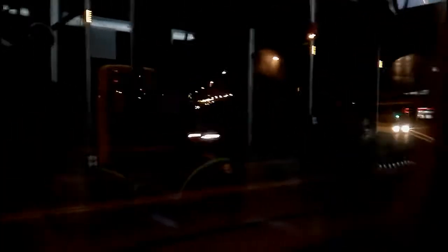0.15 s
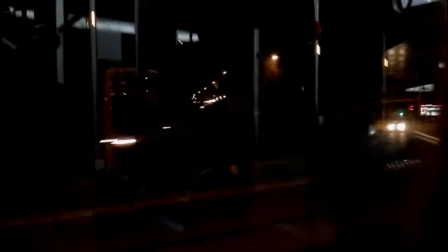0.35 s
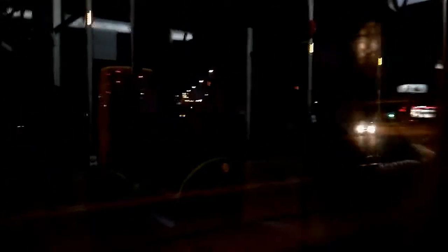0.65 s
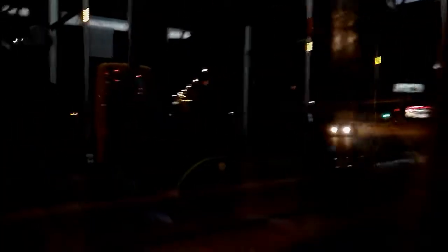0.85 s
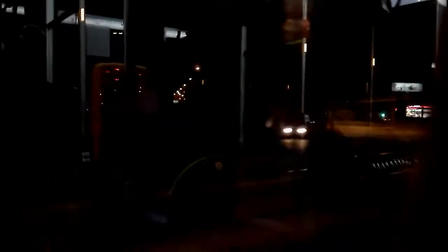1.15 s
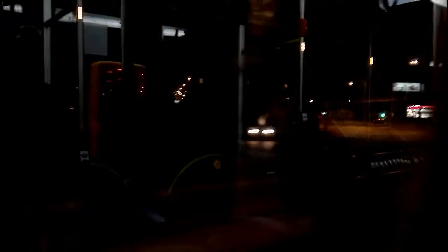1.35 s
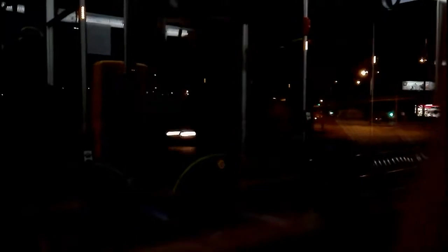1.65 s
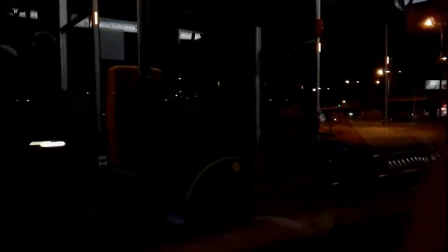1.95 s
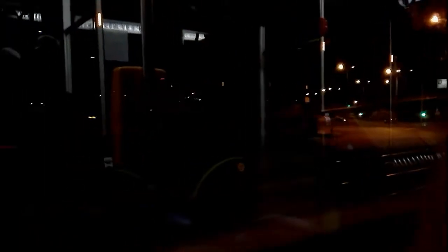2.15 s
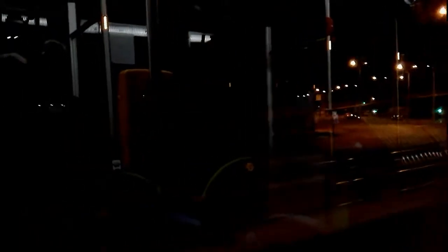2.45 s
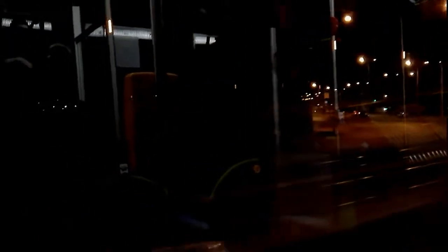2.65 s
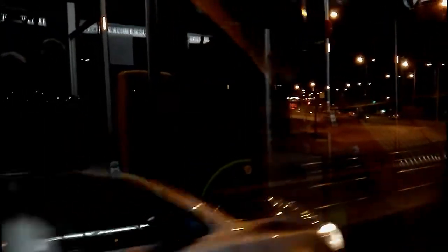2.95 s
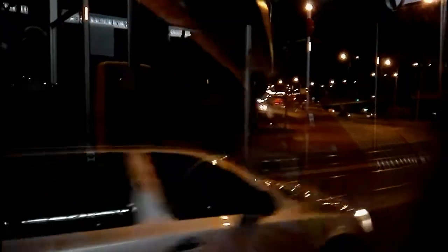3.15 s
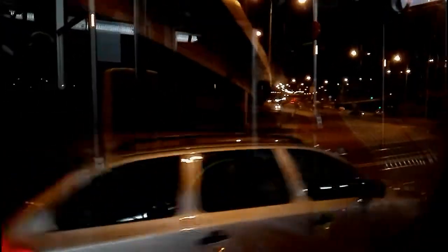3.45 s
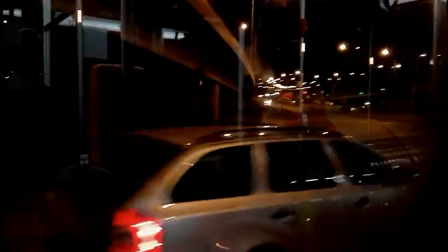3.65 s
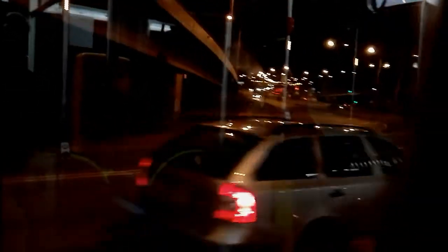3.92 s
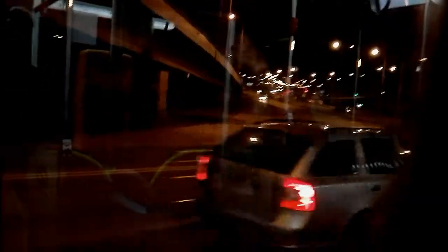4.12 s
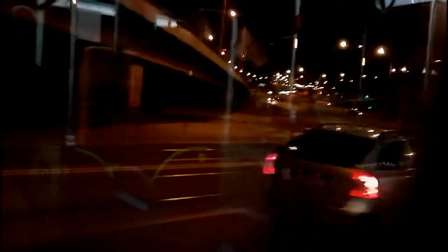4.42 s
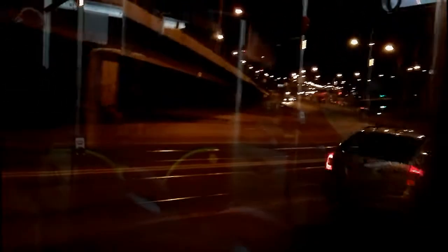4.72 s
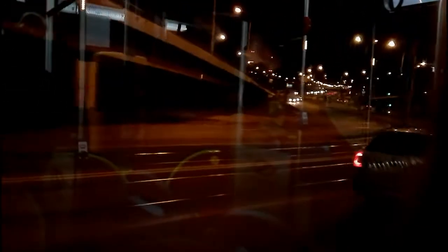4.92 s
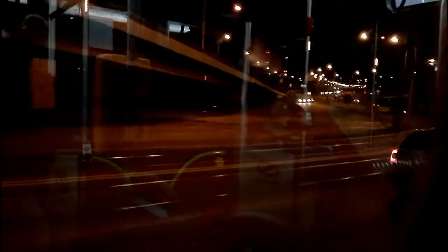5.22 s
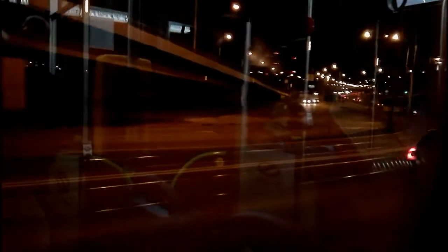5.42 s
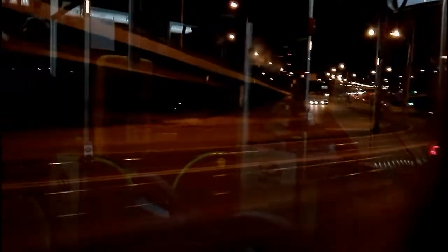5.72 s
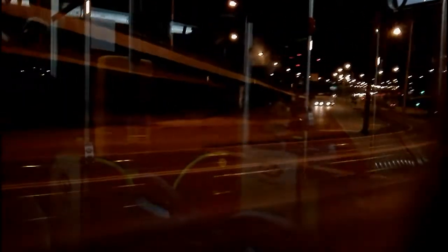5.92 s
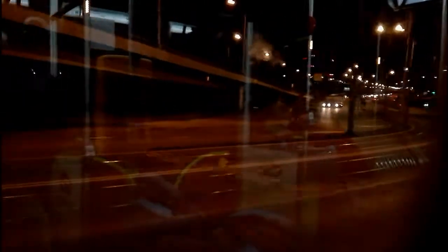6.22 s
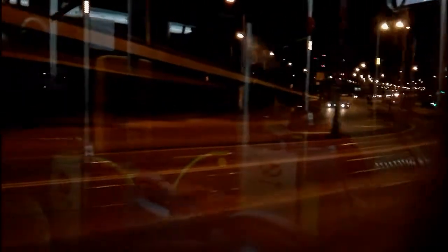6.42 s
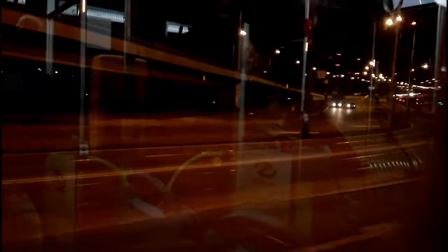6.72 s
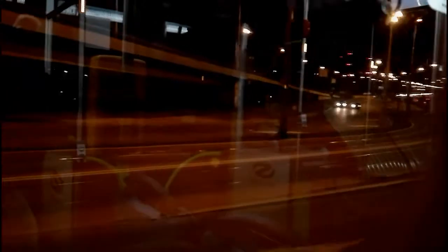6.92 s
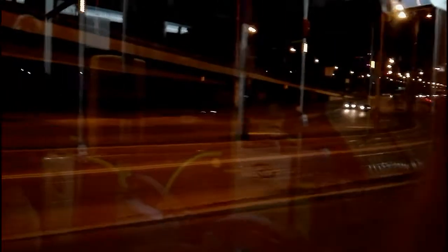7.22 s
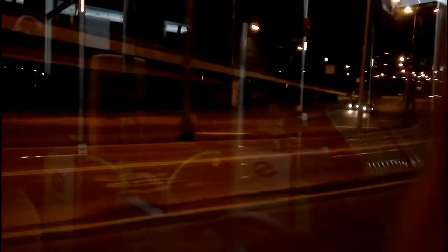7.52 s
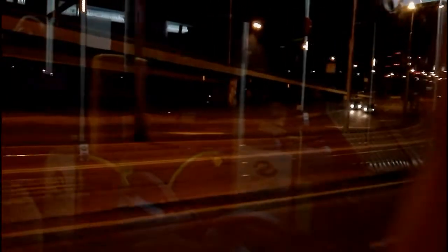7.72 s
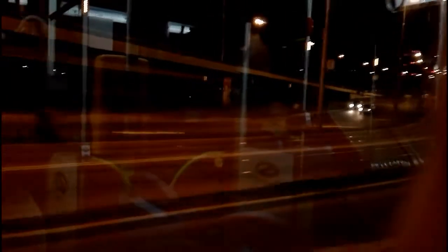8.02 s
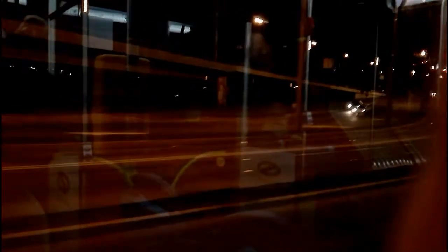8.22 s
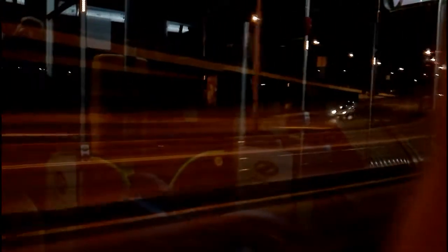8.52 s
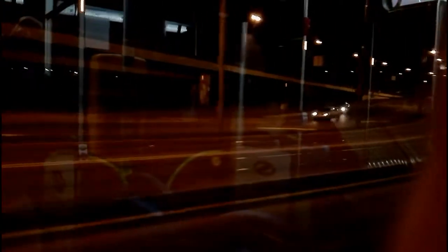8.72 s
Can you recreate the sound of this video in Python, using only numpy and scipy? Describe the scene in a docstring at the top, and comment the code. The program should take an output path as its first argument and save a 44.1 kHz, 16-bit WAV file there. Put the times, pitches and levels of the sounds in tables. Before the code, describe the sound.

Inside a city bus rolling steadily at night, a low diesel drone and a shaft hum sit in dark road and air roar. Very deep bumps come thickly in the first second. Loose trim chatters at once, then a thin turbo whistle flickers and climbs. The engine pull eases near four seconds, and panel knocks come close to the end. Single-channel pickup inside the cabin.

```python
"""Inside a city bus rolling at a nearly steady speed, with road and air roar filling the cabin.
The roar is shaped noise; trim panels tick, rattle and knock as random contacts shake them.
A turbocharger whistles on a moving pitch, and the wheels hop over the road far down as slow, deep swings.
A six-cylinder diesel drones in sines at multiples of its crank speed; a drive shaft and a gear mesh hum along."""
import sys
import numpy as np
from scipy import signal
from scipy.fft import rfft, irfft, next_fast_len
from scipy.io import wavfile
from scipy.ndimage import uniform_filter1d

SR = 44100
rng = np.random.default_rng(int(sys.argv[2]) if len(sys.argv) > 2 else 0)


def digitize_waveform(pressure):
    """Quantize a signal to 16-bit integers and store it at the path in sys.argv[1].

    Rows of a 2-D input are taken as channels; values are limited to [-1, 1].
    """
    field = np.atleast_2d(pressure).T
    bounded = np.clip(field, -1, 1)
    quanta = np.round(bounded * 32767).astype(np.int16)
    wavfile.write(sys.argv[1], SR, quanta)


N = 391166  # length in samples

# Cabin roar over time: start_s, level_db (550 to 1800 Hz), treble_lift_db
ROAR_LEVEL = [(0, -46, 5), (1.7, -47, 1.5), (2.2, -45.5, 1), (2.8, -46.5, 1), (4.6, -47, 3),
              (5.2, -47.5, 2), (5.8, -47, 1.5), (7, -48, 3), (7.8, -45.5, 2.5), (8.87, -45.5, 3)]
# Colour of the roar: pitch_hz, relative_level_db
ROAR_COLOUR = [(26, -39), (45, 0), (62, -7), (110, -6.5), (170, -10.5), (230, -10.5), (265, -13),
               (295, -12.5), (340, -16), (413, -21.5), (460, -22), (540, -27), (700, -25), (850, -24.5),
               (920, -27), (1050, -26), (1450, -30), (1700, -34), (2050, -39), (3700, -45.5), (4600, -50.5),
               (7000, -52), (9500, -61.5), (14200, -76.5)]

# Trim ticks: start_s, bright_contact_level_db, duller_panel_level_db (nominal peaks)
TICKS = [(.0952, -71, -66), (.164, -62, -55), (.5894, -68, -58), (.7194, -64, -59), (0.9193, -60, -47.5),
         (1.0091, -62, -62), (2.0725, -66, -56), (2.135, -63, -62), (2.4049, -64, -61), (2.4694, -67, -58),
         (2.969, -69, -56), (3.6509, -61, -58), (3.815, -65, -62), (4.24, -64, -55), (4.34, -65, -57),
         (4.369, -64, -57), (4.79, -68, -62), (5.043, -68, -57), (5.3293, -67, -62), (5.521, -62, -66),
         (6.299, -74, -58), (7.0683, -63, -59), (7.4994, -69, -59), (7.779, -70, -62), (8.246, -68, -60)]
# Loose trim chattering, blow by blow: start_s, level_db, centre_hz, width_hz
RATTLE_BLOWS = [(.256, -51, 6500, 9000), (.262, -56, 3200, 3000), (.273, -54, 4800, 3000),
                (.281, -58, 9000, 10000), (.295, -50.5, 6000, 10000), (.302, -51, 5000, 9000),
                (.309, -51, 3000, 5000), (.317, -54, 7000, 11000), (.328, -55, 7000, 10000),
                (.343, -54, 2800, 4000), (.359, -54, 3500, 5000), (.367, -57, 6500, 5000),
                (.381, -56, 5700, 1500), (.395, -56, 5800, 3000), (.404, -56, 6500, 5000),
                (.418, -56, 4500, 4500), (.428, -57, 6500, 3500), (4.5, -58, 6000, 1800),
                (4.512, -58, 5700, 1800), (4.522, -58, 6500, 1800), (7.373, -50, 7400, 1800),
                (7.379, -49, 6300, 2200), (7.388, -53, 6000, 2600), (7.398, -56, 6500, 2600),
                (7.41, -59, 6000, 2600), (7.431, -60, 6500, 1800)]
# Ringing modes of the trim: pitch_hz, t60_s (time to fall by 60 dB)
TRIM_MODES = [(1950, .014), (2500, .008), (3150, .008), (3900, .008), (4350, .008), (4800, .009),
              (5250, .009), (5670, .012), (6220, .01), (6630, .011), (7070, .011), (7600, .007),
              (8200, .006), (8900, .004), (9700, .004), (10800, .003), (12000, .003), (13300, .003)]
# Knocks on a panel: start_s, level_db, brightness_db_per_octave, rise_s, contact_s
KNOCKS = [(7.373, -50.5, 0, .002, .024), (7.408, -55, 1, .003, .008), (7.78, -53, -5, .008, .012),
          (7.792, -40.5, -4, .002, .006), (7.796, -40.5, 1, .002, .01), (7.809, -46, -2, .003, .014),
          (8.255, -51, -9, .002, .008), (8.262, -49, -2, .003, .008), (8.267, -46, 1, .002, .01),
          (8.276, -48.5, 0, .002, .008), (8.286, -53, 0, .003, .012)]
# Ringing modes of the panel: pitch_hz, t60_s, relative_level_db
PANEL_MODES = [(1030, .02, -7), (1380, .022, -2), (1500, .025, -1), (1720, .02, -4), (2150, .012, -8),
               (2450, .012, -6), (2850, .014, -2), (3200, .012, -1), (3520, .016, -2), (3800, .012, -4),
               (4250, .008, -7), (4850, .007, -9), (5750, .005, -15), (7000, .003, -20)]
# Short bright hisses: start_s, level_db, centre_hz, width_hz, rise_s, hold_s, t60_s
HISSES = [(4.473, -60.5, 6100, 2400, 0.022, 0.028, 0.11), (7.37, -59, 6600, 2400, 0.002, 0.012, 0.25)]

# Turbocharger pitch: time_s, pitch_hz
TURBO_PITCH = [(1.98, 5015), (2.1, 5060), (2.46, 5180), (2.66, 5260), (3.0, 5355), (3.45, 5460),
               (3.6, 5455), (4.7, 5385), (5.42, 5140), (5.66, 5020), (5.88, 5025), (6.1, 5120)]
# Turbocharger level: time_s, level_db
TURBO_LEVEL = [(1.6, -90), (1.75, -79), (1.93, -80), (2, -69.5), (2.06, -71), (2.11, -81), (2.2, -71.5),
               (2.35, -73), (2.4, -80), (2.45, -71), (2.52, -88), (2.63, -85), (2.69, -70.5), (2.75, -79),
               (2.8, -68.5), (2.86, -79), (2.95, -70.5), (3.02, -80), (3.1, -72.5), (3.2, -84), (3.27, -78),
               (3.38, -84), (3.45, -71), (3.5, -69.5), (3.57, -72), (3.64, -90), (4.65, -90), (4.78, -76),
               (5.15, -79), (5.3, -88), (5.4, -82), (5.46, -71), (5.52, -73), (5.58, -70.5), (5.65, -71),
               (5.71, -88), (5.84, -86), (5.9, -75), (6.05, -82), (6.15, -90)]
# Faint broken tone: start_s, length_s, level_db
TONE_SPELL = (4.5, 2.95, -62.5)

# Road bumps: peak_s, wheel_hop_db, floor_shudder_db
BUMPS = [(0.056, -16.5, -29), (.15, -40, -36), (.34, -16, -23), (.41, -15, -28), (.47, -21, -25),
         (.62, -23, -33), (.72, -19.5, -26), (.85, -18, -39), (.95, -30, -23.5), (1.03, -21, -23),
         (1.14, -19, -25), (1.47, -27.5, -38), (1.94, -27, -40), (2.25, -34.5, -34), (2.62, -34, -33),
         (3.11, -33, -41), (3.35, -22, -37), (4.01, -41, -38), (4.43, -38, -32), (5.02, -26.5, -43),
         (5.13, -23.5, -41), (5.94, -34, -40), (6.18, -28, -39), (6.38, -25, -35), (6.6, -33, -36),
         (6.89, -51, -41), (7.55, -42, -39), (7.99, -44, -43), (8.27, -23, -36), (8.38, -20, -40),
         (8.48, -29, -31), (8.82, -39, -36)]

# Engine speed: time_s, firings_hz (one group of three cylinders)
ENGINE_SPEED = [(0, 25.28), (.35, 25.18), (2.3, 25.72), (3.3, 25.88), (4.3, 25.94), (5.8, 25.95),
                (6.6, 26.13), (8.87, 26.88)]
# The driveline judders about ten times a second as the pull ends: start_s, length_s, speed_share_db
JUDDER = [(3.8, 1.6, -43)]
# Engine load, heard as the level of the firing order: time_s, level_db
ENGINE_LOAD = [(.4, -39), (.65, -31), (.8, -29), (1.05, -26), (1.2, -25.5), (1.6, -27), (2.4, -24),
               (3.55, -26), (3.9, -35.5), (4.2, -35.5), (4.45, -26.5), (4.8, -27.5), (5.1, -45), (5.5, -40),
               (5.9, -33), (6.4, -40), (7.2, -41.5), (7.9, -32.5), (8.87, -34.5)]
# Engine order 7.5, which fades after the pull: time_s, level_db
UPPER_ORDER = [(.2, -41), (.7, -34), (1.7, -33), (3.6, -38), (4, -46), (6, -48), (7, -44), (8.87, -44)]
# Weaker engine orders; uneven cylinders fill the halves: crank_multiple, level_db (before the pull change)
ENGINE_ORDERS = [(4, -38), (5, -50), (6, -35.5), (6.5, -49), (8, -45), (8.5, -46), (9, -46), (9.5, -57),
                 (10, -51), (10.5, -59), (12, -58.5), (12.5, -69), (13, -52), (13.5, -54), (15, -62),
                 (16, -57.5), (16.5, -50.5), (17, -53.5), (17.5, -60.5), (19, -60), (19.5, -65.5),
                 (22, -56.5)]
# The weaker engine orders sink when the pull ends: time_s, change_db
PULL = [(.2, -1), (1, -1.5), (3.5, -2.5), (3.9, -5.5), (6, -5), (8.87, -5)]
# Weaker drive shaft orders: shaft_multiple, level_db
SHAFT_ORDERS = [(2, -50.5), (5, -42), (6, -52.5), (12, -56), (18, -61)]
# Strong drive shaft orders: time_s, order_4_db, order_10_db
SHAFT_HUM = [(.2, -47, -53), (.6, -40, -44.5), (1, -42, -49.5), (1.5, -42, -42), (2, -32.5, -44),
             (2.4, -43, -45.5), (3, -53, -40), (3.3, -28, -43), (3.6, -41, -57), (3.9, -35.5, -43),
             (4.2, -35, -48.5), (4.7, -41, -40), (5.1, -32, -45), (5.5, -42, -43), (6, -35, -43),
             (6.3, -48, -42.5), (6.6, -33.5, -47.5), (7.2, -35.5, -41.5), (7.5, -35, -50), (8.4, -31, -43),
             (8.87, -31, -42.5)]
# Gear mesh and two high shaft orders: time_s, mesh_db, order_17_db, order_20_db
MESH_LEVEL = [(.2, -51, -73, -57), (1.5, -48.5, -72, -67), (2.4, -52, -73, -75), (4.5, -51, -75, -56),
              (5.6, -48.5, -76, -53), (6.2, -55.5, -72, -57.5), (7.5, -54, -70, -51.5),
              (8.5, -52, -63, -52.5)]

TICK_RISE_S, TICK_CONTACT_S = .008, 0.021
FAINT_TICK_DB, FAINT_SPREAD_DB = (-69, -70), 9  # loudest bright and panel levels; how far they may fall
RATTLE_RISE_S, RATTLE_T60_S = 0.002, .1
CONTACTS_PER_S = 3000  # average rate of tiny contacts while something is struck
TONE_HZ = 853
HOP_HZ, BUMP_RISE_S, HOP_T60_S = 12.8, 0.2, 0.54
SHUDDER_HZ, SHUDDER_RISE_S, SHUDDER_T60_S = 33, 0.061, 0.26
HEAVE_SHARE, SHUDDER_NOISE_SHARE = .35, .6  # noise beside each swinging tone
SMOOTH_HOP_DB, SMOOTH_SHUDDER_DB, UNEVEN_DB = -33.5, -41.5, 0.5  # the road between bumps
SPEED_WOBBLE = .001  # typical share by which the speed drifts
SHAFT_PER_CRANK, MESH_PER_CRANK = 1.396, 28.575  # speed ratios
THIRD_DB = -36.5  # middle level of engine order 4.5
EDGE_HZ = 14380  # upper limit of this sound's band


def gain_of(db):
    """Turns decibels into amplitude."""
    return 10 ** (np.asarray(db) / 20)


def evened(x):
    """Scales a signal to an rms (average strength) of 1."""
    return x / np.sqrt(np.mean(x ** 2) + 1e-20)


def curves(rows):
    """Joins the points of each table column by straight lines in time."""
    time_s, *columns = np.transpose(rows)
    t = np.arange(N) / SR
    return [np.interp(t, time_s, column) for column in columns]


def add(mix, start_s, sound):
    """Lays a sound into the mix at a time, cut off at the end."""
    part = mix[round(start_s * SR):][:len(sound)]
    part += sound[:len(part)]


def band_noise(size, hz, width_hz):
    """Makes noise whose spectrum is a bell around one pitch, with rms 1."""
    padded = next_fast_len(size, real=True)
    f = np.fft.rfftfreq(padded, 1 / SR)
    random_spectrum = rng.standard_normal(len(f)) + 1j * rng.standard_normal(len(f))
    bell = 1 / (1 + (2 * (f - hz) / width_hz) ** 2)
    return evened(irfft(random_spectrum * bell, padded)[:size])


def drift(spread_db):
    """Makes a level in dB that wanders slowly, over about a second or longer."""
    return spread_db * band_noise(N, 0, 1.7)


def chatter(size, spread_db):
    """Makes a contact's strength jump up and down within about a millisecond."""
    return gain_of(spread_db * band_noise(size, 0, 640))


def tone(hz, db, waver_db):
    """Makes a sine on a moving pitch whose level wavers at random."""
    phase = 2 * np.pi * (np.cumsum(hz) / SR + rng.random())
    level = gain_of(db + waver_db * band_noise(N, 0, 13.4))
    return np.sqrt(2) * level * np.sin(phase)  # a sine of rms 1 peaks at the root of 2


def spells(rows, edge_s):
    """Makes an amplitude that swells before each spell, holds through it and dies after."""
    t = np.arange(N) / SR
    total = 0
    for start_s, length_s, db in rows:
        inside_s = np.minimum(t - start_s, start_s + length_s - t)
        total = total + gain_of(db) * np.clip(inside_s / edge_s + 1, 0, 1) ** 2
    return total


def jolts(peak_s, dbs, rise_s, t60_s):
    """Makes an amplitude that swells to each blow and dies away; overlapping powers add."""
    t = np.arange(0, N / SR, .001)  # steps of a millisecond are fine enough
    late_s = t[:, None] - np.asarray(peak_s)
    swell = np.clip(late_s / rise_s + 1, 0, 1) ** 2
    shape = swell * gain_of(np.asarray(dbs) - 60 * np.maximum(late_s, 0) / t60_s)
    return np.interp(np.arange(N) / SR, t, np.sqrt((shape ** 2).sum(1)))


def struck(force, hz, t60_s, db):
    """Rings a set of modes by tiny random contacts that follow the force over time."""
    t = np.arange(SR // 32) / SR
    rings = gain_of(-60 * t / t60_s[:, None]) * np.sin(2 * np.pi * hz[:, None] * t)
    share = gain_of(db) / np.linalg.norm(gain_of(db))
    rings *= (share / np.linalg.norm(rings, axis=1))[:, None]
    touching = rng.random(len(force)) < CONTACTS_PER_S / SR
    contacts = force * touching * np.sqrt(SR / CONTACTS_PER_S)  # fewer contacts hit harder
    hits = contacts * rng.standard_normal((len(hz), len(force)))
    return signal.fftconvolve(hits, rings, axes=1).sum(0)


def roar():
    """Road and air make noise whose spectrum drifts in patches; loose trim makes the treble flicker."""
    hop = 256  # samples between short spectra
    frames, hz = N // hop + 5, np.fft.rfftfreq(1024, 1 / SR)
    real, imaginary, patches = rng.standard_normal((frames, len(hz), 3)).T
    patches = uniform_filter1d(patches, 10, 0)  # smooth across pitch
    patches = evened(uniform_filter1d(patches, 12, 1))  # smooth across time
    level_db, lift_db = curves(ROAR_LEVEL)
    lift_db = np.interp(np.arange(frames) * hop, np.arange(N), lift_db)
    treble = np.clip(np.log2(hz / 1300 + 1e-9) / 3, 0, 1)[:, None]  # 0 below 1300 Hz, 1 three octaves up
    flicker = evened(uniform_filter1d(rng.standard_normal(frames), size=6))
    change_db = 0.76 * patches + treble * (lift_db + 1.4 * flicker)
    spectra = (real + 1j * imaginary) * gain_of(change_db)
    uncoloured = signal.istft(spectra, nperseg=1024, noverlap=1024 - hop)[1]

    f = np.fft.rfftfreq(len(uncoloured), 1 / SR)
    colour_hz, colour_db = np.transpose(ROAR_COLOUR)
    colour = gain_of(np.interp(np.log(f + 1), np.log(colour_hz + 1), colour_db))
    spectrum = rfft(uncoloured) * colour
    middle = irfft(spectrum * (f > 550) * (f < 1800), len(uncoloured))  # the band that sets the level
    return gain_of(level_db) * irfft(spectrum, len(uncoloured))[:N] / np.std(middle)


def ticks():
    """Brief contacts give very high noise with duller panel noise below; a faint rustle fills between."""
    out, t = np.zeros(N), np.arange(SR // 8) / SR
    crest = 2.6  # peak over rms of a noisy contact
    faint = []
    for when, softness in rng.random(size=(30, 2)):
        faint.append((when * N / SR, *(FAINT_TICK_DB - FAINT_SPREAD_DB * softness)))
    contact = np.exp(-(t / TICK_CONTACT_S) ** 2)
    tail = 0.36 * gain_of(-60 * t / 0.22)
    shape = np.clip(t / TICK_RISE_S, 0, 1) * (contact + tail)
    for start_s, bright_db, panel_db in TICKS + faint:
        bright = gain_of(bright_db) * band_noise(len(t), 11900, 2200)
        panel = gain_of(panel_db) * band_noise(len(t), 6800, 6000)
        tick = shape * chatter(len(t), 2.5) * (bright + panel) / crest
        add(out, max(start_s - TICK_RISE_S, 0), tick)
    rustle = gain_of(2.8 * band_noise(N, 0, 15)) * band_noise(N, 11500, 5000)
    return out + gain_of(-86) * rustle


def rattle():
    """Ragged runs of small blows ring the trim, each blow reaching its own range of modes."""
    out, t = np.zeros(N), np.arange(SR // 10) / SR
    force = np.clip(t / RATTLE_RISE_S, 0, 1) * gain_of(-60 * t / RATTLE_T60_S)
    modes_hz, t60_s = np.transpose(TRIM_MODES)
    for start_s, db, hz, width_hz in RATTLE_BLOWS:
        reach_db = -20 * np.log10(1 + (2 * (modes_hz - hz) / width_hz) ** 2)
        add(out, start_s - RATTLE_RISE_S, gain_of(db) * struck(force, modes_hz, t60_s, reach_db))
    return out


def hisses():
    """Bursts of high noise rise, hold briefly and die away."""
    out, t = np.zeros(N), np.arange(SR // 4) / SR
    for start_s, db, hz, width_hz, rise_s, hold_s, t60_s in HISSES:
        fading_s = np.maximum(t - rise_s - hold_s, 0)
        shape = np.clip(t / rise_s, 0, 1) * gain_of(-60 * fading_s / t60_s)
        noise = chatter(len(t), 3.2) * band_noise(len(t), hz, width_hz)
        add(out, start_s, gain_of(db) * shape * noise)
    return out


def knocks():
    """Each blow or bounce rings the panel modes, which go on buzzing faintly."""
    out, t = np.zeros(N), np.arange(SR // 4) / SR
    hz, t60_s, mode_db = np.transpose(PANEL_MODES)
    buzz = .36 * gain_of(-60 * t / 0.39)
    for start_s, db, tilt_db, rise_s, contact_s in KNOCKS:
        force = np.clip(t / rise_s, 0, 1) * (np.exp(-(t / contact_s) ** 2) + buzz)
        tilted_db = mode_db + tilt_db * np.log2(hz / 3000)
        add(out, start_s, gain_of(db) * struck(force, hz, t60_s, tilted_db))
    return out


def whistles():
    """The turbocharger's fluttering sine climbs and sinks in pitch; a lower tone nearly holds its own."""
    pitch_hz, = curves(TURBO_PITCH)
    level_db, = curves(TURBO_LEVEL)
    flutter_db = level_db + 1.4 * band_noise(N, 0, 30)
    turbo = tone(pitch_hz * (1 + 0.0015 * band_noise(N, 0, 33)), flutter_db, .4)
    steady = tone(TONE_HZ * (1 + .004 * band_noise(N, 0, 12)), 0, 2.8)
    return turbo + spells([TONE_SPELL], 0.7) * steady


def road():
    """Wheels hop on springy tyres near one low pitch, the body heaves around it, the floor shudders above."""
    peak_s, hop_db, shudder_db = np.transpose(BUMPS)
    hop_size = jolts(peak_s, hop_db, BUMP_RISE_S, HOP_T60_S)
    hop_size += gain_of(SMOOTH_HOP_DB + drift(UNEVEN_DB))
    shudder_size = jolts(peak_s, shudder_db, SHUDDER_RISE_S, SHUDDER_T60_S)
    shudder_size += gain_of(SMOOTH_SHUDDER_DB + drift(UNEVEN_DB))

    hop_hz = HOP_HZ * (1 + .06 * band_noise(N, 0, 1.526))
    hop = np.sqrt(2) * np.sin(2 * np.pi * np.cumsum(hop_hz) / SR)
    heave = band_noise(N, 10, 12)
    shudder_hz = SHUDDER_HZ * (1 + .1 * band_noise(N, 0, 4))
    shudder = np.sqrt(2) * np.sin(2 * np.pi * np.cumsum(shudder_hz) / SR)
    shudder_noise = band_noise(N, SHUDDER_HZ, 28.0)
    low = hop_size * evened(hop + HEAVE_SHARE * heave)
    return low + shudder_size * evened(shudder + SHUDDER_NOISE_SHARE * shudder_noise)


def crank_speed():
    """Gives crank turns per second, drifting a little, with a spell of judder."""
    slow = SPEED_WOBBLE * band_noise(N, 0, 4)
    judder = spells(JUDDER, .3) * band_noise(N, 10, 8)
    firings_hz, = curves(ENGINE_SPEED)
    return firings_hz * 2 / 3 * (1 + slow + judder)  # three cylinders fire once each in two turns


def driveline(crank):
    """Crank, drive shaft and gear mesh sound at fixed multiples (orders) of one shared speed."""
    fire_db, = curves(ENGINE_LOAD)
    upper_db, = curves(UPPER_ORDER)
    pull_db, = curves(PULL)
    hum_db, moan_db = curves(SHAFT_HUM)
    mesh_db, order_17_db, order_20_db = curves(MESH_LEVEL)
    shaft = crank * SHAFT_PER_CRANK

    engine = tone(3 * crank, fire_db, 0.78)  # six cylinders fire three times a turn
    engine += tone(4.5 * crank, THIRD_DB + drift(1.5), 0.5)
    engine += tone(7.5 * crank, upper_db, 0.38)
    for order, db in ENGINE_ORDERS:
        engine += tone(order * crank, db + pull_db, 2.54)

    shaft_hum = tone(4 * shaft, hum_db, 0.52) + tone(10 * shaft, moan_db, 0.66)
    shaft_hum += tone(17 * shaft, order_17_db, 2) + tone(20 * shaft, order_20_db, 2)
    for order, db in SHAFT_ORDERS:
        shaft_hum += tone(order * shaft, db, 2.45)

    gear_mesh = tone(MESH_PER_CRANK * crank, mesh_db, 1.0)
    return engine + shaft_hum + gear_mesh


def scene():
    """Adds all sources at one listening spot, as a single channel."""
    trim = ticks() + rattle() + hisses() + knocks()
    return (roar() + trim + whistles() + road() + driveline(crank_speed()))[None]


def record(dry):
    """A steep low-pass filter removes what lies above the band's upper limit."""
    taps = signal.firwin(511, EDGE_HZ, window=("kaiser", 9), fs=SR)[None]
    padded = np.pad(dry, [(0, 0), (255, 255)], "reflect")  # keeps the length and timing
    return signal.oaconvolve(padded, taps, "valid")


dry = scene()
out = record(dry)
digitize_waveform(out)
```